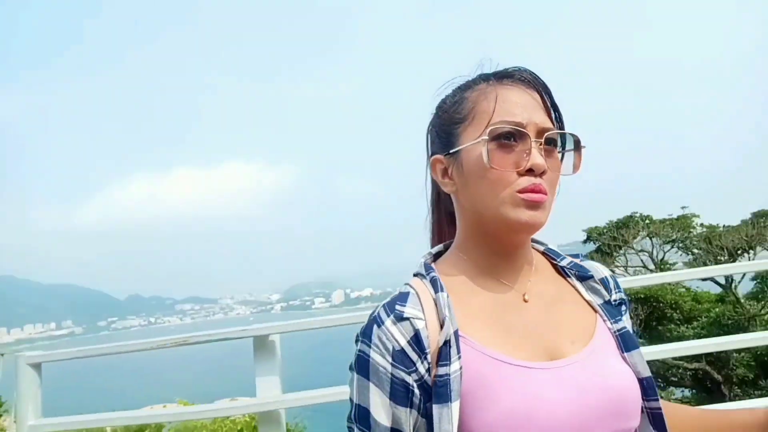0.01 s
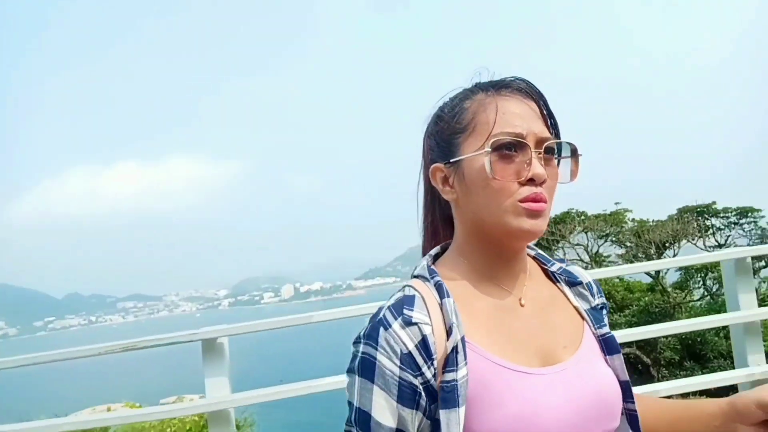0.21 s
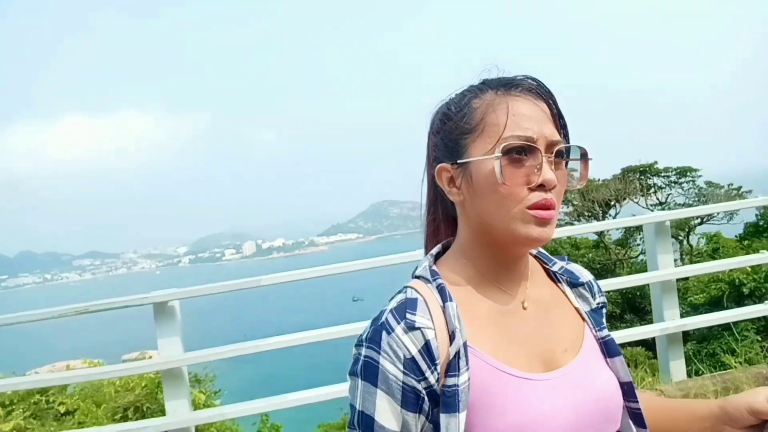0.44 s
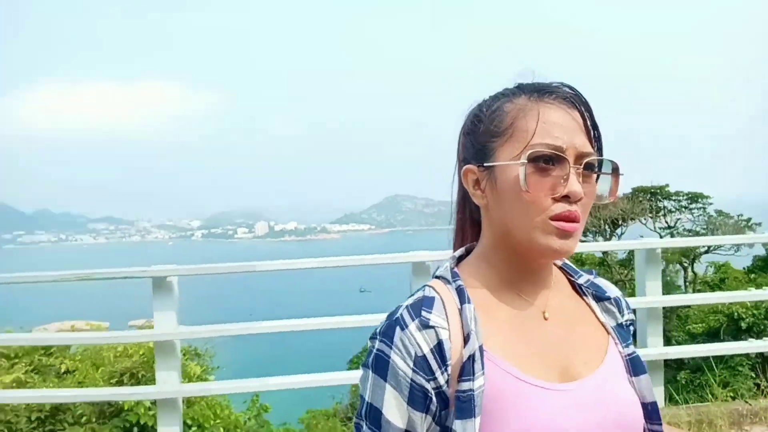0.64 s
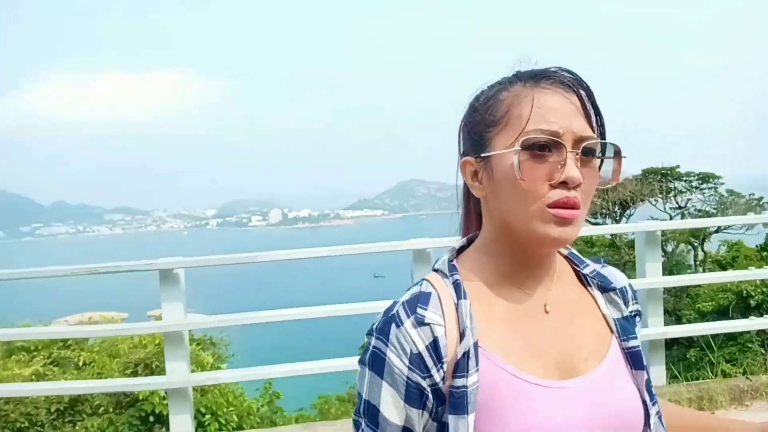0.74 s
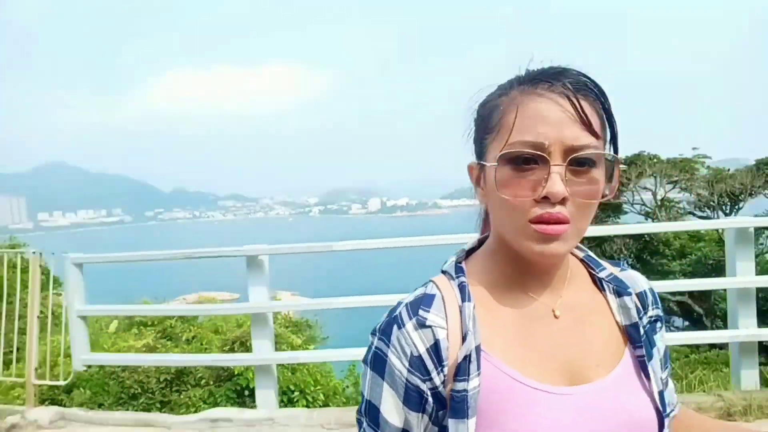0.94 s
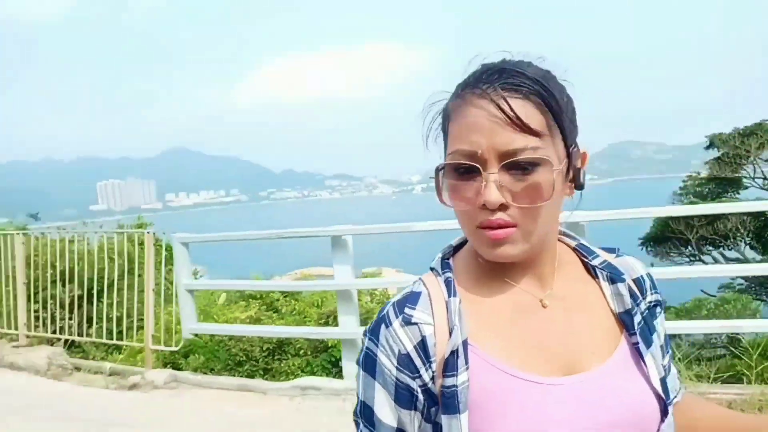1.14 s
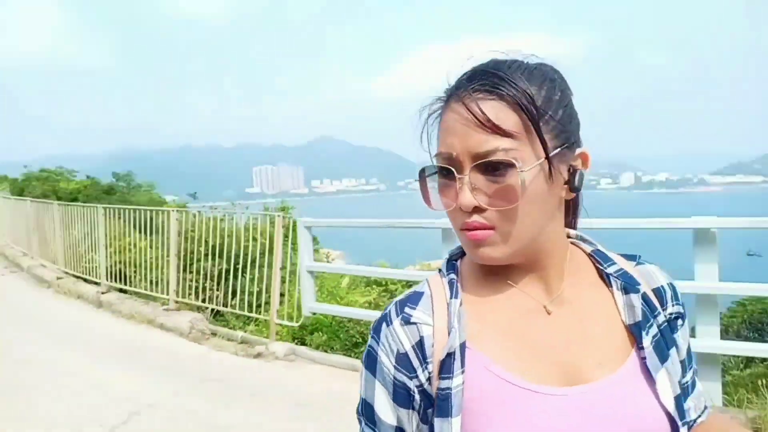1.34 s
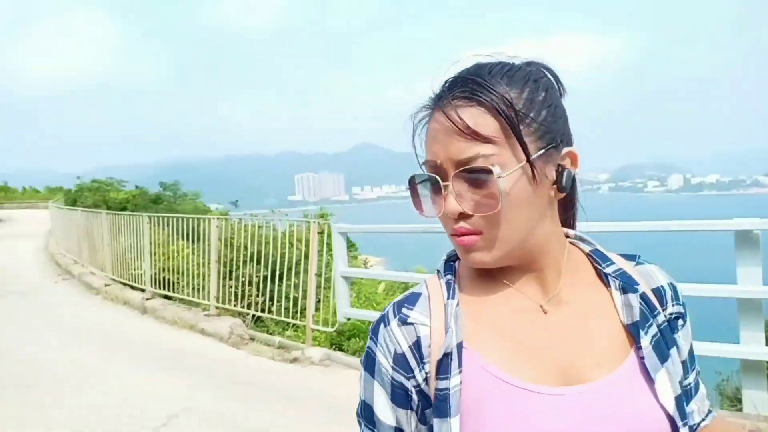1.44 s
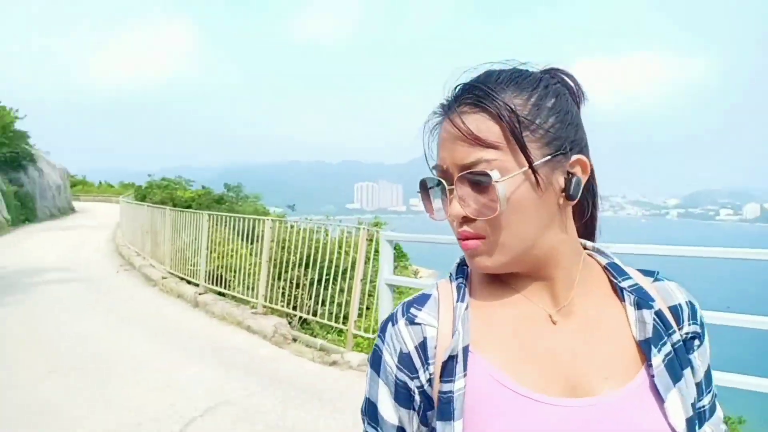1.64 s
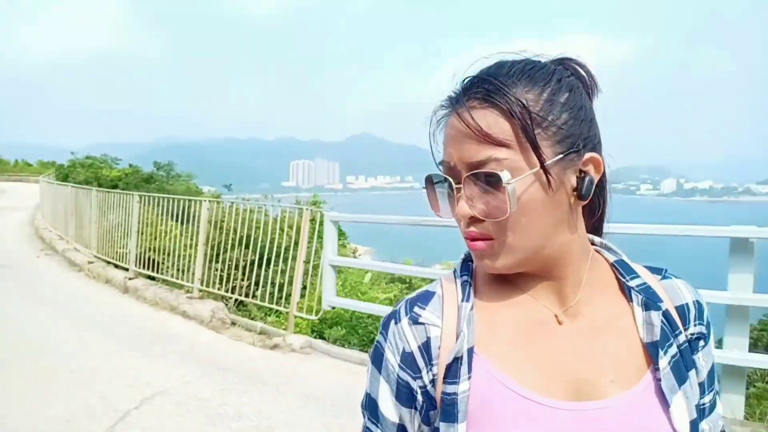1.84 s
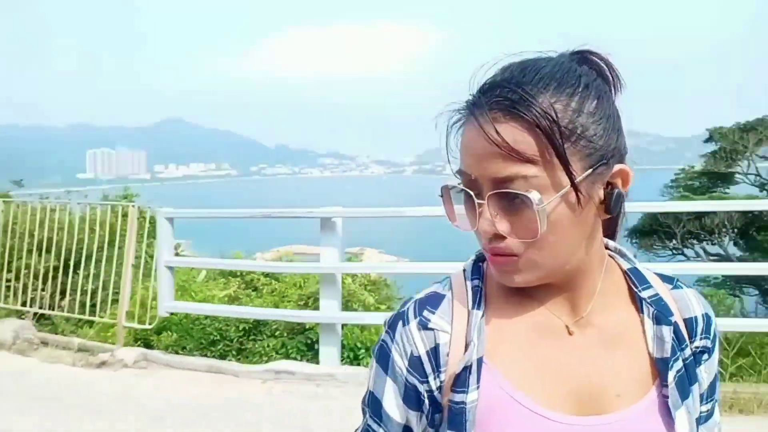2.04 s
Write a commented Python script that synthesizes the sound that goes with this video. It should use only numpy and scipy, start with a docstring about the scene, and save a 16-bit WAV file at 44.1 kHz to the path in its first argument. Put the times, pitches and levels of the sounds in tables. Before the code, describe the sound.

Cicadas drone high and steady while wind rumbles and thumps on the microphone.

```python
"""Cicadas drone on a hillside by the sea while gusts of wind rumble and thump on the microphone.
Each cicada clicks its tymbals (ribbed, drum-like skins), and the clicks make its body ring. One singer
throbs over a chorus near 5 kHz, with a finer buzz and a thin sizzle above. A small bird peeps far off.
Close by come one short scrape and a few faint scuffs, ticks and crackles, and a small clink."""
import sys
import numpy as np
from scipy import signal
from scipy.fft import rfft, irfft, next_fast_len
from scipy.io import wavfile
from scipy.ndimage import uniform_filter1d

SR = 44100
rng = np.random.default_rng(int(sys.argv[2]) if len(sys.argv) > 2 else 0)


def output_pcm(signal):
    """Save a mono or channel-first signal as 16-bit PCM at the path in sys.argv[1].

    Samples are clipped to [-1, 1] before scaling.
    """
    pcm = np.clip(np.atleast_2d(signal).T, -1, 1) * 32767
    wavfile.write(sys.argv[1], SR, np.round(pcm).astype(np.int16))


N = 92610
T = np.arange(N) / SR

# How strongly the insects' bodies ring at each pitch: pitch_hz, relative_db
CICADA_BODY = [(3500, -44), (4350, -23.5), (4750, -7), (5000, 4.5), (5200, 6), (5450, 1.5), (5750, -9),
               (6200, -30), (7500, -43)]
LOW_CICADA_BODY = [(3800, -29.5), (4450, -8), (4750, 5), (4950, 6), (5300, -16), (6000, -34)]
BUZZ_BODY = [(5500, -40), (6800, -8), (7700, -6), (8300, 1), (9000, 0), (9400, -4.5), (10600, -5.5),
             (12200, -23.5), (13300, -16), (14000, -14.5)]
SIZZLE_BODY = [(10500, -58), (12500, -23), (14000, -4), (15000, 5), (15600, 7.5), (16500, 2.5)]
# The singer's clicks and its narrow ring, at the top of a throb: time_s, level_db
SINGER_LEVEL = [(0, -58.5), (.15, -49.5), (.28, -50), (.41, -47.5), (.53, -44.5), (.75, -49.5), (1, -64),
                (2.1, -51.5)]
SINGER_RING_LEVEL = [(0, -56.5), (.15, -48), (.28, -50), (.42, -63.5)]
# How loud the other insects are over time: time_s, level_db
LOW_CICADA_LEVEL = [(0, -66.5), (.5, -59), (.66, -54), (.74, -50), (.88, -55), (1, -59.5), (2.1, -61)]
CHORUS_LEVEL = [(0, -56.5), (.45, -55), (.7, -53.5), (.87, -50), (1.08, -50.5), (1.28, -46.5), (1.37, -52),
                (1.44, -48.5), (1.6, -54.5), (1.69, -49.5), (1.83, -51.5), (1.88, -60), (2.1, -53)]
BUZZ_LEVEL = [(0, -58), (.4, -58), (.62, -50.5), (.82, -47.5), (1, -52.5), (1.17, -58.5), (1.3, -58),
              (1.5, -56), (1.68, -61), (1.9, -61.5), (2.08, -55)]
SIZZLE_LEVEL = [(0, -55), (.2, -52), (.45, -51), (.65, -48.5), (1.05, -50.5), (1.29, -48.5), (1.35, -59),
                (1.77, -54), (1.84, -65), (1.98, -68), (2.04, -59), (2.1, -63)]
# Strength of the wind on the microphone: time_s, level_db
GUST_LEVEL = [(0, -63), (.05, -29.5), (.09, -47.5), (.19, -29.5), (.27, -28.5), (.32, -37), (.40, -22),
              (.59, -21), (.66, -40), (.79, -25.5), (.92, -34.5), (1.02, -28), (1.08, -33.5), (1.11, -29.5),
              (1.14, -29.5), (1.24, -40), (1.29, -28.5), (1.38, -28.5), (1.41, -38.5), (1.51, -29.5),
              (1.55, -43.5), (1.8, -68), (1.87, -58), (2.03, -53.5), (2.07, -40), (2.1, -51)]
# Tone of the wind's deep rumble and of its higher flutter: pitch_hz, relative_db
RUMBLE_TONE = [(20, -43), (35, -21.5), (52, -4), (75, 2.5), (115, -1), (165, -9.5), (225, -18),
               (330, -33.5), (500, -44.5), (1000, -58), (3000, -88)]
FLUTTER_TONE = [(100, -28.5), (180, -2.5), (260, 2.5), (340, -4), (480, -17.5), (800, -45.5), (2000, -69)]
# Swirls of air that thump the microphone: middle_s, pitch_hz, strength_db, half_length_s. The last row is not a
# swirl but a soft, low bump right at the very end.
THUMPS = [(.215, 128.6, -10.5, 0.0046), (.243, 117, -13, 0.0054), (.401, 131, -11, 0.0035),
          (.4657, 148, -3.5, 0.0039), (.4335, 124, -11.5, 0.0022), (.531, 152, -11, 0.0022),
          (.591, 170, -14, 0.0019), (0.695, 122, -12, 0.0017), (.837, 116, -19, 0.0016),
          (1.005, 128, -14, 0.0037), (1.143, 119, -10, 0.0024), (1.161, 98, -9, 0.0027),
          (1.209, 104, -14, 0.0049), (2.088, 115, -24.5, 0.0042)]
# The bird's peeps: start_s, start_pitch_hz, length_s, level_db, roughness_0_to_1
PEEPS = [(.592, 3330, 0.048, -56, .3), (0.867, 3340, 0.05, -53.5, .03), (0.916, 3370, 0.045, -55, 0),
         (1.038, 3270, .025, -58, .4), (1.256, 3250, 0.056, -59, 0.6), (1.32, 2810, .028, -58.5, .5),
         (1.382, 3320, 0.03, -57, 0.06), (1.435, 3320, 0.044, -54, 0), (1.477, 3310, 0.052, -57, 0.1),
         (1.993, 3340, 0.075, -60, 0.77)]
# Tone of the scrape's grit: pitch_hz, relative_db
SCRAPE_TONE = [(250, 1), (600, 4.5), (1300, -5.5), (2200, 1.5), (2900, -1.5), (4300, 5.5), (6500, -4),
               (10500, -11), (15500, -9.5)]
# Notes that ring in the scrape and in the clink: pitch_hz, level_db
SCRAPE_NOTES = [(1907, -51), (2400, -57), (3910, -50.5), (4328, -48), (4473, -46.5), (8184, -47.5),
                (8518, -60)]
CLINK_NOTES = [(2030, -55), (6330, -52), (9050, -50), (13400, -52)]
# Soft scuffs: start_s, length_s, pitch_hz, width_hz, level_db
SCUFFS = [(0.334, 0.037, 5500, 7100, -53.5), (0.438, 0.055, 2940, 453, -51), (0.523, 0.061, 2720, 604, -58),
          (0.838, 0.02, 4200, 1500, -53), (1.408, 0.12, 2950, 1400, -59), (2.042, 0.047, 4400, 2400, -56)]
# Sharp ticks: start_s, level_db, decay_s, pitch_hz, width_hz
TICKS = [(0.771, -34.5, 0.003, 5530, 10000), (0.7886, -29.5, 0.0012, 7000, 16000),
         (1.063, -45.5, 0.0048, 4560, 7000), (1.2246, -36, 0.0011, 10500, 11000),
         (1.234, -47.5, 0.007, 10000, 10000)]
# Tone of the distant background: pitch_hz, relative_db
AIR_TONE = [(20, -27), (55, -8.5), (110, 3.5), (170, -5.5), (280, -3.5), (400, -8.5), (700, -15.5),
            (1200, -23.5), (2200, -29), (4000, -29.5), (6500, -31.5), (10000, -31.5), (12500, -34.5),
            (16000, -52)]
# How loud that background is: time_s, level_db
AIR_LEVEL = [(0, -47), (.3, -44.5), (1.3, -44.5), (1.75, -46), (1.92, -49.5), (2.1, -47)]


def singer(throb_hz=8.4, peak_s=0.1546, ring_hz=5165):
    """One cicada throbs, with a narrow, whistle-like ring that is strongest at first."""
    swing = np.cos(2 * np.pi * throb_hz * (T - peak_s))
    throb = (1 + np.tanh(2 * swing + .5)) / 2  # a soft on-off switch
    narrow_ring = ring(ring_hz, wander_hz=34.25) * amp(2 * walk(200))
    song = tymbals(CICADA_BODY, count=3) * curve(SINGER_LEVEL)
    return throb * (song + narrow_ring * curve(SINGER_RING_LEVEL))


def other_cicadas():
    """A lower neighbour and a wavering chorus click away without the throb."""
    neighbour = tymbals(LOW_CICADA_BODY, count=3) * curve(LOW_CICADA_LEVEL)
    chorus = tymbals(CICADA_BODY, count=5) * amp(0.84 * walk(30.54))
    return neighbour + chorus * curve(CHORUS_LEVEL)


def tymbals(body, count, base_hz=290.5):
    """Several uneven streams of clicks, each at its own speed, make one body ring."""
    snaps = sum(clicks(base_hz * rng.uniform(.6, 1.2), jitter=.2, scatter_db=3.0) for _ in range(count))
    return colour(snaps - snaps.mean(), body)


def buzz(tymbal_hz=104, ribs_hz=832):
    """A fine, high buzz: hiss pulsed by a tymbal and, faster, by its ribs."""
    turn = 2 * np.pi * np.cumsum(1 + 0.0057 * walk(8.1)) / SR  # the speed drifts a little
    pulse = (1 + 0.25 * np.cos(tymbal_hz * turn)) * (1 + 0.18 * np.cos(ribs_hz * turn))
    pulsed_hiss = colour(rng.standard_normal(N) * pulse, BUZZ_BODY)
    return pulsed_hiss * amp(.5 * walk(26.9)) * curve(BUZZ_LEVEL)


def sizzle():
    """The highest insect sound is a thin hiss that flickers quickly."""
    flicker = amp(1.7 * walk(170))
    return colour(rng.standard_normal(N), SIZZLE_BODY) * flicker * curve(SIZZLE_LEVEL)


def wind(smooth_s=0.0252, swirl_share=0.36):
    """Gusts rumble on the microphone and single swirls thump it; the strongest of both flutter."""
    flow = colour(rng.standard_normal(N), RUMBLE_TONE)
    power = uniform_filter1d(flow ** 2, int(smooth_s * SR))
    even_flow = flow / np.sqrt(power + 1e-4)  # evened out, so the gusts shape the loudness
    force = curve(GUST_LEVEL)
    pressure = even_flow * force * amp(1.82 * walk(45.1))
    for middle_s, hz, db, half_length_s in THUMPS:
        nearness = np.exp(-np.abs(T - middle_s) / half_length_s)
        swirl = amp(db) * 2 * nearness / (1 + nearness ** 2)  # a rounded bump
        pressure -= swirl * np.sin(2 * np.pi * hz * (T - middle_s))
        force = np.hypot(force, swirl_share * swirl)
    flutter = colour(rng.standard_normal(N), FLUTTER_TONE)
    return pressure + amp(-3.5) * force ** 1.734 * flutter


def bird(fall_hz_per_s=3600, blur_hz=260, echo_db=-7, echo_decay_s=.04):
    """Short falling whistles, roughened and echoed by the trees."""
    waver_hz = 18 * walk(250)
    scatter = (walk(blur_hz) + 1j * walk(blur_hz)) / np.sqrt(2)  # shakes both loudness and pitch
    peeps = np.zeros(N)
    for start_s, start_hz, length_s, db, rough in PEEPS:
        pitch_hz = start_hz - fall_hz_per_s * (T - start_s) + waver_hz
        whistle = np.exp(2j * np.pi * np.cumsum(pitch_hz) / SR)
        blur = np.sqrt(1 - rough) + np.sqrt(rough) * scatter
        peeps += amp(db) * arch(start_s, length_s) * np.imag(whistle * blur)
    trees = rng.standard_normal(N) * fade(0, echo_decay_s)
    echo = signal.fftconvolve(peeps, trees / np.sqrt(np.sum(trees ** 2)))[:N]
    return peeps + amp(echo_db) * echo


def scrape(start_s=.77, rise_s=0.001, hold_s=0.023, decay_s=0.0095):
    """A brief gritty slide that crackles and sets a few notes ringing."""
    grit = colour(rng.standard_normal(N) * amp(walk(1200)), SCRAPE_TONE)
    snaps = clicks(700, jitter=.45, scatter_db=2.5)
    crackle = colour(snaps, [(2000, -7), (8000, -1), (15500, -2)])
    notes = sum(amp(db) * ring(hz, wander_hz=12) for hz, db in SCRAPE_NOTES)
    rise = np.clip((T - start_s) / rise_s, 0, 1)
    fall = np.exp(-np.maximum(T - start_s - hold_s, 0) / decay_s)
    return rise * fall * (amp(-35.5) * grit + amp(-41) * crackle + notes)


def scuffs():
    """Soft puffs of hiss swell and fade close by."""
    return sum(amp(db) * arch(start, length) * band(hz, width) for start, length, hz, width, db in SCUFFS)


def ticks():
    """Tiny bursts of hiss start sharply and die at once."""
    return sum(amp(db) * fade(start, decay) * band(hz, width) for start, db, decay, hz, width in TICKS)


def clink(start_s=1.225, ring_s=.08):
    """A few high notes ring together, dropping 60 dB in ring_s."""
    notes = sum(amp(db) * band(hz, width_hz=450) for hz, db in CLINK_NOTES)
    return notes * fade(start_s, ring_s / np.log(1000))


def rustle(start_s=0.27, length_s=0.24, crackles_per_s=130):
    """A brief patch of faint dry crackles, each a tiny burst of hiss."""
    grains = (rng.random(N) < crackles_per_s / SR) * amp(3 * rng.standard_normal(N))
    burst = rng.standard_normal(N) * fade(0, 0.00071)
    crackles = signal.fftconvolve(grains, burst)[:N]
    bright = colour(crackles, [(1200, -12), (3500, -4), (8000, 0), (15000, -10)])
    return amp(-54.5) * arch(start_s, length_s) * bright


def distant_air():
    """A soft, low rush lies behind everything."""
    return colour(rng.standard_normal(N), AIR_TONE) * curve(AIR_LEVEL)


def amp(db):
    """Turn decibels into a number to multiply by."""
    return 10 ** (np.asarray(db) / 20)


def unit(x):
    """Scale a signal to a typical size (rms) of 1."""
    return x / np.sqrt(np.mean(x ** 2) + 1e-20)


def curve(rows):
    """Join time_s, level_db points into a loudness curve."""
    return amp(np.interp(T, *np.array(rows).T))


def colour(x, rows):
    """Shape the tone through pitch_hz, relative_db points; the result has size 1."""
    hz, db = np.array(rows).T
    size = next_fast_len(N + 8192) * 2
    bins_hz = np.maximum(np.arange(size // 2 + 1) * SR / size, 1)
    gain = amp(np.interp(np.log(bins_hz), np.log(hz), db))
    # Fold the filter so it rings after each click, never before it.
    folded = irfft(np.log(gain))
    folded[1:size // 2] *= 2
    folded[size // 2 + 1:] = 0
    return unit(irfft(rfft(x, size) * np.exp(rfft(folded)))[:N])


def band(hz, width_hz):
    """Hiss around one pitch, at size 1."""
    bins_hz = np.arange(N // 2 + 1) * SR / N
    bell = 1 / (1 + (2 * (bins_hz - hz) / width_hz) ** 4)
    return unit(irfft(rfft(rng.standard_normal(N)) * bell, N))


def walk(rate_hz):
    """A smooth random wobble of size 1."""
    hold = max(int(SR / rate_hz), 1)
    steps = np.repeat(rng.standard_normal(N)[:N // hold + 1], hold)
    return unit(uniform_filter1d(uniform_filter1d(steps, hold), hold)[:N])


def clicks(rate_hz, jitter, scatter_db):
    """A stream of clicks, uneven in timing and strength."""
    cycles = np.cumsum(rate_hz * (1 + jitter * walk(rate_hz))) / SR + rng.random()
    return np.diff(np.floor(cycles), prepend=0) * amp(scatter_db * rng.standard_normal(N))


def ring(hz, wander_hz):
    """A note of size 1 whose pitch wanders slightly."""
    cycles = np.cumsum(hz + wander_hz * walk(150)) / SR + rng.random()
    return np.sqrt(2) * np.sin(2 * np.pi * cycles)


def arch(start_s, length_s):
    """A smooth rise and fall."""
    return np.sin(np.pi * np.clip((T - start_s) / length_s, 0, 1))


def fade(start_s, decay_s):
    """A sudden start that dies away."""
    return (T >= start_s) * np.exp(-np.maximum(T - start_s, 0) / decay_s)


def scene():
    """Add all the sounds into one channel."""
    air = distant_air() + wind()
    animals = singer() + other_cicadas() + buzz() + sizzle() + bird()
    close_by = scrape() + scuffs() + ticks() + clink() + rustle()
    return (air + animals + close_by)[None]


def record(dry, top_hz=15800):
    """Cut off the very highest treble."""
    return signal.sosfilt(signal.ellip(12, .2, 90, top_hz, fs=SR, output="sos"), dry)


dry = scene()
out = record(dry)
output_pcm(out)
```